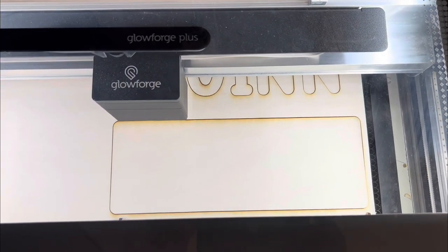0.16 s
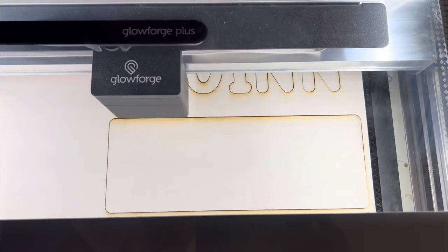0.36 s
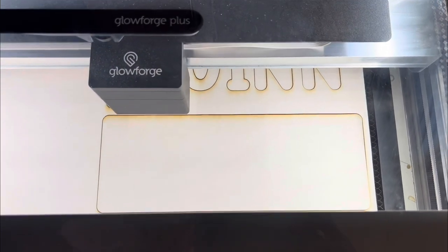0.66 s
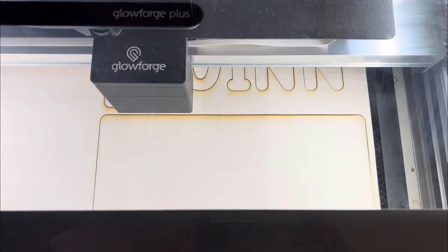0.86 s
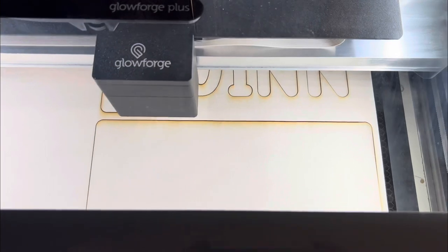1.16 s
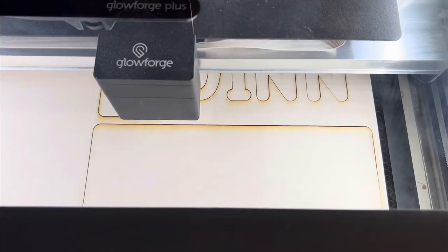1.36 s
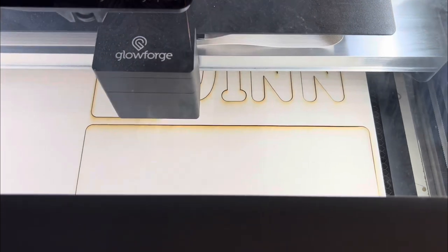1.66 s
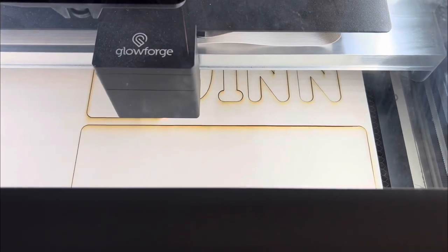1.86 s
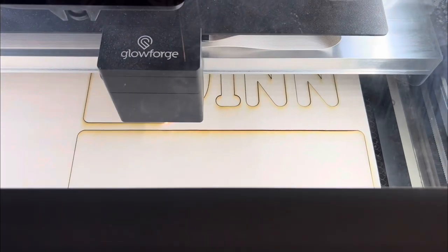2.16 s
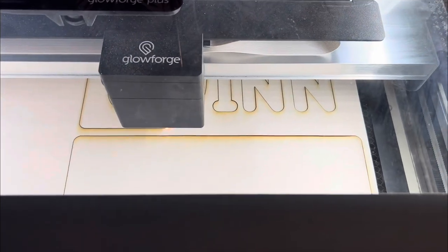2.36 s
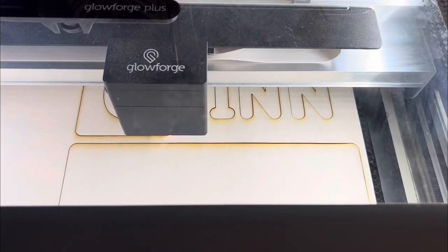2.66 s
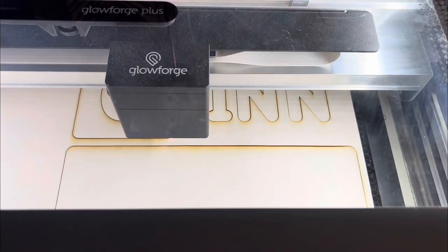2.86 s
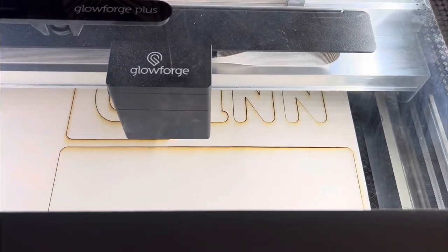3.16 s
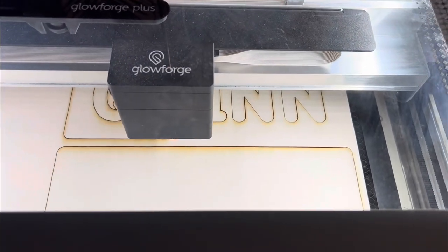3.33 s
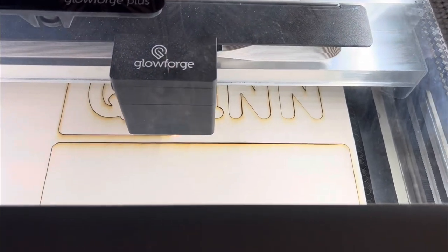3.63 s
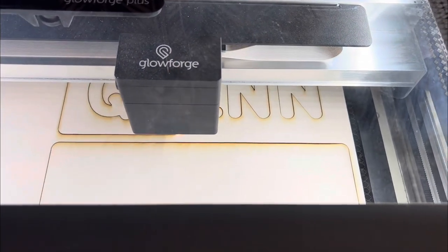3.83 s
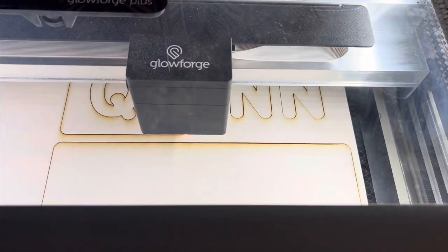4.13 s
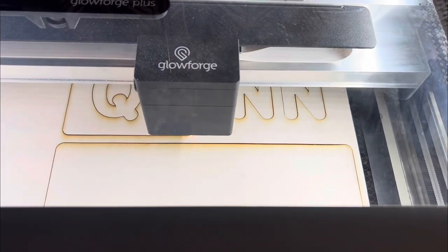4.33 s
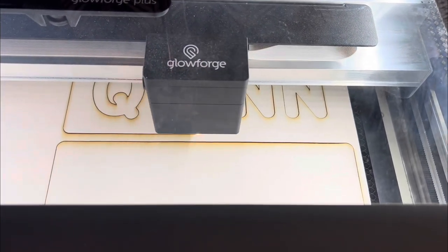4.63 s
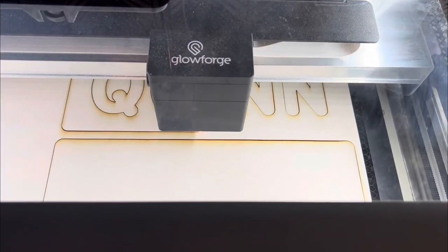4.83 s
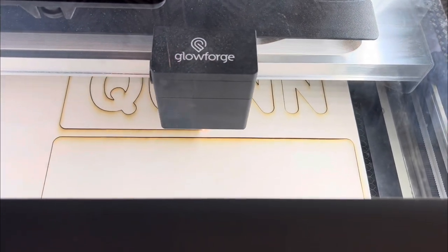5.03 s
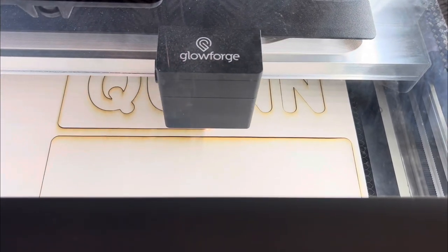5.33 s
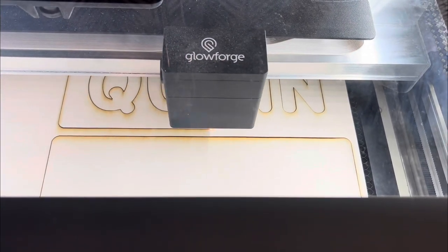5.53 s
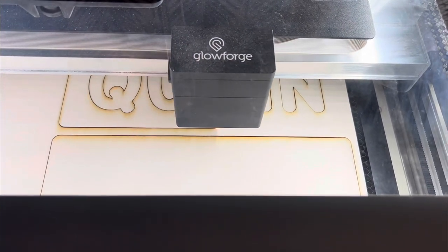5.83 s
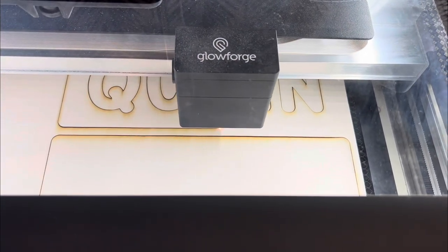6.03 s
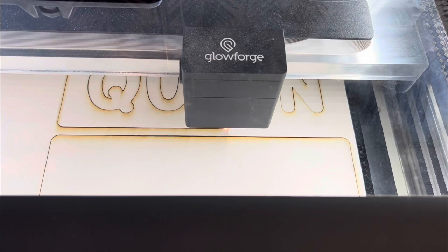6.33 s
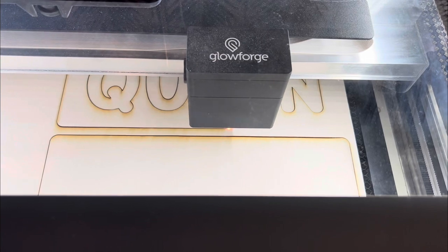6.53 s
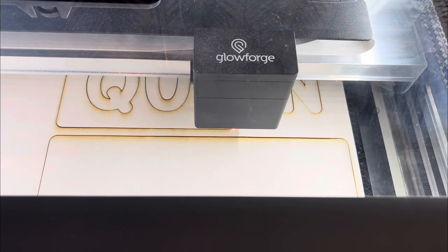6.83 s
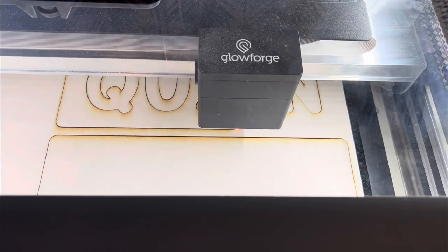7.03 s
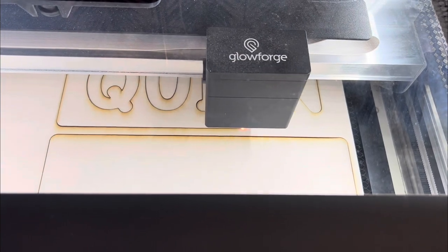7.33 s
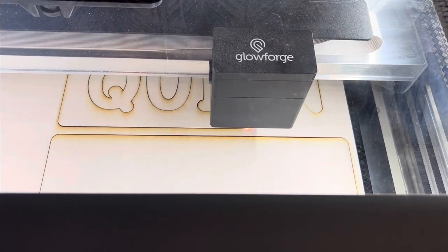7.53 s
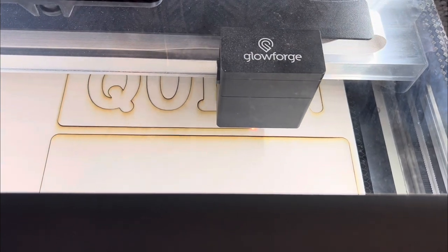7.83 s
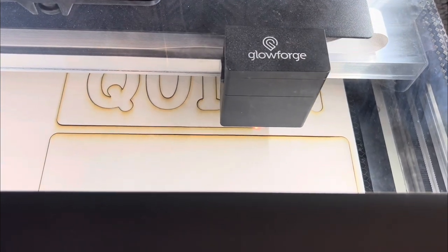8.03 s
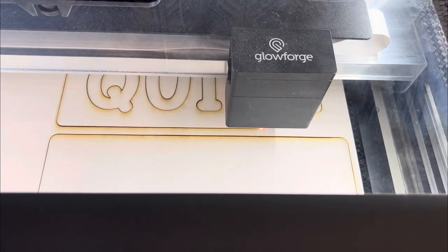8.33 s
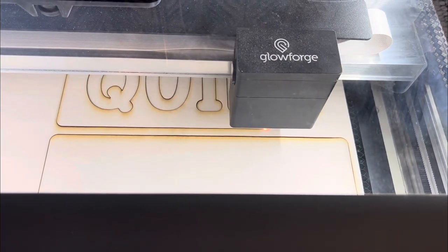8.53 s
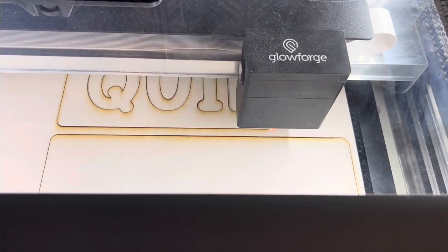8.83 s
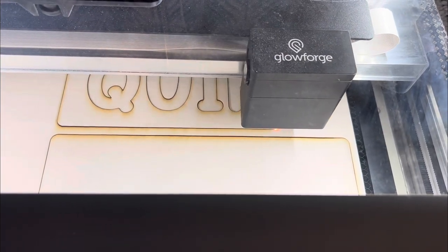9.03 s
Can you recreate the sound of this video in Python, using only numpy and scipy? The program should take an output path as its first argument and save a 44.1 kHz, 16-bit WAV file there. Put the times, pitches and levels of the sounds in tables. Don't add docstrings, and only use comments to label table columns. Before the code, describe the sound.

Close, continuous drone of a desktop laser cutter: piercing fan whine, lower steady exhaust hum, broad airy hiss, and a faint deep throb.

```python
import sys
import numpy as np
from scipy import signal
from scipy.fft import rfft, irfft, next_fast_len
from scipy.io import wavfile
from scipy.ndimage import map_coordinates

SR = 44100
rng = np.random.default_rng(int(sys.argv[2]) if len(sys.argv) > 2 else 0)


def wrap_up_sound(samples):
    columns = np.atleast_2d(samples).T
    tamed = np.clip(columns, -1, 1)
    steps = np.round(tamed * 32767).astype(np.int16)
    wavfile.write(sys.argv[1], SR, steps)


def field_ratio(decibels):
    return 10 ** (np.asarray(decibels, dtype=float) / 20)


N = 404838
STEP = 64
CONTROL_S = np.arange(0, N + STEP, STEP) / SR
HZ = np.fft.rfftfreq(next_fast_len(N), 1 / SR)
EDGE = 2.7
BLADES = 5
CRUISE_HZ = 1103
EXHAUST_HZ = 484.95
TOP_EARLY_DB = 3.5
THROB_DB = -46.5

# time in seconds, share of the way (0-1).
MIC_SETTLING = [
    (0, 0.01),
    (.7, 0.07),
    (1.6, 0.95),
    (2.4, 0.96),
    (9.18, 1),
]

# early level in dB, late level in dB.
AIR_LEVELS = [(-41.5, -42), (-45.5, -47.5)]
# frequency in Hz, level in dB per Hz.
BODY_COLOUR = [(35, -38), (80, -9), (110, -5.5), (180, -6.5), (350, -1), (700, -0.5), (800, -3.5),
               (1100, -3.5), (1400, -5.5), (2050, -4), (2300, -1), (2700, -8), (3500, -11.5), (12000, -48)]
# frequency in Hz, level in dB per Hz.
HISS_COLOUR = [(1500, -14.5), (3500, -1), (5000, 0), (7000, -2.5), (9000, -8), (12000, -17), (12700, -26),
               (13700, -20), (15500, -22.5)]
# frequency in Hz, side minus mid in dB, share tied to the centre (-1..1).
RUSH_WIDTH = [(100, -45, 0), (200, -25.5, -0.26), (380, -11, 0), (700, -4, 0.4), (1400, -2.5, .2),
              (1600, -13, .2), (1850, -20, .2), (2200, -9, .2), (3240, 1, 0), (3900, -5, 0),
              (5150, -6, -.2), (5800, -3, -.65), (10000, -2.5, -.5), (15000, 1, -.3)]
# resonance in Hz, width in Hz, rms level in dB.
BOX_CAVITIES = [(121.7, 12.5, -47.5), (139.6, 17, -50), (208.8, 7.7, -49), (257, 24, -38.5),
                (274.8, 4.8, -47.5), (322, 27, -48.5), (409.3, 6.5, -54), (551, 3.4, -51),
                (1078, 8.9, -52.5), (2314, 23, -59)]
# time in seconds, half length in seconds, change in dB.
HOSE_THROBS = [(.22, .06, 6.3), (.58, 0.16, -8), (1.1, .09, 5.1), (2.32, .2, 4.2), (3.66, .09, -7),
               (4.1, .06, 6.1), (4.3, .06, -7.9), (4.88, 0.16, -8.3), (5.26, .13, 5), (5.78, 0.075, 6),
               (6.2, .13, 3.7), (6.58, .13, -7.9), (7.2, 0.11, -3.7), (7.6, .08, 4.5), (7.92, .08, 1),
               (8.9, .4, 5)]

# early level in dB, late level in dB, slow drift in dB.
EXHAUST_LEVELS = [(-33.3, -33, 0.1), (-37, -53.5, -1.5), (-47.5, -40, -0.16), (-42.5, -42, -0.8)]
# time in seconds, half length in seconds, change in dB.
EXHAUST_WAVES = [
    [(2.8, .9, 0.8)],
    [(1.3, .25, 1), (2, .45, -9), (7, .3, 3), (6.5, .3, 3)],
    [(.78, .09, -8), (1.25, .3, 2), (2.5, .8, 2.2)],
    [(.02, .32, -19), (1.4, .6, 3), (6.9, 1.2, -2)],
]
# multiple of the blade rate, level row it follows, offset from that in dB, side level in dB,
# early side phase in radians, late side phase in radians, flutter (0-1).
EXHAUST_HARMONICS = [(1, 0, 0, -48.5, 1, 1.8, 0.03), (2, 1, 0, -45, -4.5, -1, 0.15),
                     (3, 2, 0.5, -55, 1.5, -2, 0.18), (4, 2.5, -12.5, -82, 0, 2, 0.25),
                     (5, 3, -0.5, -56, -1, -7, 0.21), (6, 1, -5, -53, 2.4, 4, 0),
                     (7, 3, -10, -60, -1, -8.5, 1)]

# time in seconds, blade rate in Hz.
HEAD_SPEED = [(0, 1104.6), (.67, 1106.1), (.9, 1105.6), (1.34, 1099.2), (2.13, 1103.3), (2.46, 1102.1),
              (2.91, 1104), (3.45, 1100.2), (4.03, 1104.1), (4.48, 1104.7), (5.0, 1098.2), (5.85, 1103.6),
              (6.27, 1101.7), (6.94, 1105.7), (7.61, 1106.7), (8.1, 1104.4), (8.96, 1104.4), (9.18, 1102.6)]
# early level in dB, late level in dB, gain in dB per Hz of blade rate,
# flicker in dB.
BLADE_LEVELS = [(-33.5, -28, -0.24, 0.57), (-35, -27, 0.54, -0.03), (-48, -47, 0.93, 2),
                (-40, -41.5, .2, 0.5), (-46, -48, -0.05, 1.8), (-41.5, -54.5, -0.6, 1),
                (-42.5, -49.5, -0.4, 1.7)]
# steady side level in dB, side relative to the tone in dB,
# early side phase in radians, late side phase in radians, flutter (0-1).
BLADE_SIDES = [(-42, -9, 4.5, 1.5, 0.1), (-33, -27, 3, 1.15, 0.01), (-44.5, -4, -2.5, 0.85, 0.82),
               (-48, -14, 4, 2.3, 0.3), (-70, -3.5, -1.2, -1.2, 0.66), (-74, -2.5, -1.5, -1.5, 0.42),
               (-70, -1.5, -1.6, -1.55, 0.24)]
# beats a turn, level in dB.
TOP_TONES = [(26, -61), (31, -69), (40, -58.5), (45, -66.5), (50, -63.5), (55, -69), (60, -78), (65, -78),
             (70, -82)]
# early level in dB, late level in dB, gain in dB per Hz of blade rate,
# flicker in dB.
SHAFT_LEVELS = [(-38.2, -37, -0.37, 0.55), (-48, -52, .5, 2.5), (-43.5, -47.5, -1.1, 1.5)]
# beats a turn, side level in dB, flutter (0-1).
SHAFT_SIDES = [(1, -71, 0.15), (4, -49, 0), (8, -72, 0.08)]
# time in seconds, half length in seconds.
LID_CANCELLATIONS = [(1.078, .025), (1.21, .015), (1.29, 0.027), (2.14, .02), (2.36, .012), (2.513, .04),
                     (2.985, 0.0076), (3.222, 0.033), (3.55, 0.01), (3.78, .035), (4.56, 0.034),
                     (6.78, .03), (7.81, .03), (8.95, 0.021)]
# time in seconds, half length in seconds, multiple, change in dB.
LOW_WAVES = [(0.14, 0.2, 2, 4.5), (0.3, 0.05, 2, 2.0), (0.44, 0.07, 2, -3.5), (0.9, 0.1, 2, -12),
             (1.14, 0.092, 2, 1.5), (1.22, 0.37, 1, 3), (1.54, 0.23, 2, -6), (1.86, 0.088, 2, 1.7),
             (2.5, 0.49, 2, 2.5), (3.1, 0.075, 2, 2.2), (3.52, 0.07, 2, -2), (3.86, 0.45, 2, 1.9),
             (4.58, 0.1, 1, 2), (4.72, 0.1, 2, 3.5), (4.94, 0.054, 2, -4), (5.1, 0.25, 2, -2.5),
             (5.16, 0.16, 1, -1.3), (5.32, 0.042, 2, -4), (5.74, 0.091, 1, 1.8), (6.16, 0.62, 2, 2.1),
             (6.3, 0.22, 1, -1.1), (6.98, 0.062, 2, -2.6), (7.6, 0.062, 2, 2.5), (7.6, 0.3, 2, -4),
             (7.76, 0.088, 2, -2.3), (7.98, 0.076, 2, 1.5), (8.92, 0.07, 1, -2.0), (8.94, 0.14, 2, 1.5)]
# time in seconds, half length in seconds, multiple, change in dB.
MID_WAVES = [(0.26, 0.3, 3, -4.4), (0.9, 0.17, 3, 6.5), (0.943, 0.078, 4, 6), (1.18, 0.14, 4, -2),
             (1.7, 0.12, 4, 2), (1.82, 0.14, 3, -6.4), (2.48, 0.07, 3, -7.9), (2.54, 0.05, 4, -8),
             (2.92, 0.76, 4, 3.5), (3.403, 0.07, 4, 2), (3.52, 0.2, 3, -4.1), (3.758, 0.058, 4, -6.3),
             (4.16, 0.3, 4, 3), (4.38, 0.07, 3, -11), (4.804, 0.1, 4, 4), (5.14, 0.23, 4, -10),
             (5.16, 0.22, 3, 7.5), (5.46, 0.07, 4, 4.4), (5.903, 0.15, 4, 2), (6.12, 0.08, 3, 8),
             (6.26, 0.14, 4, -8), (6.68, 0.064, 4, 2.5), (6.88, 0.1, 4, -7.5), (7.137, 0.05, 3, -12),
             (7.242, 0.054, 4, 4.8), (7.52, 0.39, 4, -6), (7.82, 0.054, 4, -9), (8.3, 0.68, 4, 1),
             (8.502, 0.07, 3, 7), (9.16, 0.05, 4, -10)]
# time in seconds, half length in seconds, multiple, change in dB.
HIGH_WAVES = [(0.56, 0.17, 6, -10), (0.9, 0.09, 6, 4.5), (1.26, 0.12, 5, 7.3), (1.32, 0.22, 7, -5),
              (1.68, 0.11, 6, 5), (1.82, 0.23, 7, 4.5), (2.28, 0.75, 5, 3.5), (2.342, 0.69, 6, 6),
              (3.4, 0.2, 6, 7), (3.42, 0.2, 7, -4.6), (3.52, 0.27, 5, -3.3), (4.04, 0.2, 6, -6),
              (4.76, 0.06, 7, -11), (5.12, 0.31, 7, 5.5), (5.94, 0.45, 6, -4.7), (6.1, 0.45, 7, -2.7),
              (6.22, 0.2, 5, -4.6), (7.22, 0.13, 7, -4.5), (7.6, 0.2, 5, 7), (7.62, 0.2, 6, 10),
              (7.62, 0.2, 7, 8), (8.46, 0.082, 7, -4.9), (8.6, 0.71, 5, -2.5), (8.8, 0.45, 6, -2.8)]


def along(points, hz):
    f, v = np.transpose(points)
    return np.interp(np.log(hz + 1), np.log(f + 1), v)


def curve(rows):
    s, value = np.transpose(rows)
    return np.interp(CONTROL_S, s, value)


def fine(control):
    return np.interp(np.arange(N) / STEP, np.arange(len(control)), control)


def wobble(rate):
    knots = rng.standard_normal(int(N * rate / SR) + 8)
    return map_coordinates(knots, [CONTROL_S * rate])


def settling(early, late):
    return early + curve(MIC_SETTLING) * (late - early)


def swells(rows):
    return sum(db * np.exp(-np.abs((CONTROL_S - s) / half) ** EDGE) for s, half, db in rows)


def crossings(rows, which):
    return swells([(s, half, db) for s, half, k, db in rows if round(k) == which])


def dropouts():
    return sum(-12 * np.exp(-((CONTROL_S - s) / half) ** 4) for s, half in LID_CANCELLATIONS)


def tone(angle, mid_db, side_db, early_rad, late_rad, flutter):
    weak = np.clip(field_ratio(np.mean(mid_db) - mid_db), .2, 1.5)
    scatter = flutter * weak
    shake = 1 + scatter * (wobble(42) + 1j * wobble(42))
    shake = shake * np.sqrt(2 / (1 + 2 * scatter ** 2))
    mid = field_ratio(mid_db)
    side = field_ratio(side_db) * np.exp(1j * settling(early_rad, late_rad))
    spin = np.exp(1j * (angle + 2 * np.pi * rng.random()))
    left = fine(shake * (mid + side)) * spin
    right = fine(shake * (mid - side)) * spin
    return np.array([left.imag, right.imag])


def noise(gain):
    return gain * rfft(rng.standard_normal(next_fast_len(N)))


def rush(colour):
    knots = rng.standard_normal(800)
    colour = colour * field_ratio(1.1 * map_coordinates(knots, [HZ / 28]))
    side_gain = field_ratio(along([row[:2] for row in RUSH_WIDTH], HZ))
    tied = np.clip(along([row[::2] for row in RUSH_WIDTH], HZ), -.95, .95)
    centre = noise(colour)
    free = noise(colour)
    mid = irfft(centre, next_fast_len(N))[:N]
    side = irfft(side_gain * (1j * tied * centre + np.sqrt(1 - tied ** 2) * free), next_fast_len(N))[:N]
    return np.array([mid + side, mid - side]) / np.std(mid)


def air():
    body_db, hiss_db = [settling(*row) for row in AIR_LEVELS]
    body = fine(field_ratio(body_db + 9.0 + 0.46 * wobble(4))) * rush(field_ratio(along(BODY_COLOUR, HZ)))
    hiss = fine(field_ratio(hiss_db + 6.5 + 0.54 * wobble(9.9))) * rush(field_ratio(along(HISS_COLOUR, HZ)))
    peaks = np.zeros(len(HZ))
    for hz, width_hz, db in BOX_CAVITIES:
        peaks += field_ratio(2 * db) / width_hz / (1 + (2 * (HZ - hz) / width_hz) ** 2) ** 2
    boom_db = -38
    return body + hiss + field_ratio(boom_db) * rush(np.sqrt(peaks))


def duct():
    angle = 2 * np.pi * np.cumsum(fine(58.2 + 1.6 * wobble(6))) / SR
    return tone(angle, THROB_DB + swells(HOSE_THROBS), -88, 0, 0, 0.31)


def exhaust_fan():
    levels = []
    for (early, late, drift), rows in zip(EXHAUST_LEVELS, EXHAUST_WAVES):
        levels.append(settling(early, late) + drift * wobble(1.48) + swells(rows))
    angle = 2 * np.pi * np.cumsum(fine(EXHAUST_HZ + .12 * wobble(1.498))) / SR
    out = np.zeros((2, N))
    for k, row, offset_db, *rest in EXHAUST_HARMONICS:
        out += tone(round(k) * angle, levels[round(row)] + offset_db, *rest)
    return out


def head_fan():
    blade_hz = curve(HEAD_SPEED)
    angle = 2 * np.pi * np.cumsum(fine(blade_hz)) / SR

    def level(early, late, per_hz, flicker):
        return settling(early, late) + per_hz * (blade_hz - CRUISE_HZ) + flicker * wobble(7)

    out = np.zeros((2, N))
    for k, (row, (steady_db, share_db, *rest)) in enumerate(zip(BLADE_LEVELS, BLADE_SIDES), 1):
        db = level(*row)
        for waves in (LOW_WAVES, MID_WAVES, HIGH_WAVES):
            db = db + crossings(waves, k)
        if k == 4:
            db = db + dropouts()
        side_db = 10 * np.log10(field_ratio(2 * steady_db) + field_ratio(2 * (db + share_db)))
        out += tone(k * angle, db, side_db, *rest)
    for beats, db in TOP_TONES:
        db = settling(db + TOP_EARLY_DB, db) + 3 * wobble(2.55)
        out += tone(round(beats) * angle / BLADES, db, db - 2, -1.6, -1.6, 0.28)
    for row, (beats, side_db, flutter) in zip(SHAFT_LEVELS, SHAFT_SIDES):
        out += tone(round(beats) * angle / BLADES, level(*row), side_db, 0, 0, flutter)
    return out


def scene():
    return air() + duct() + exhaust_fan() + head_fan()


def low_pass(x):
    return signal.sosfilt(signal.butter(12, 15720, fs=SR, output="sos"), x)


def record(dry):
    return low_pass(dry)


dry = scene()
out = record(dry)
wrap_up_sound(out)
```